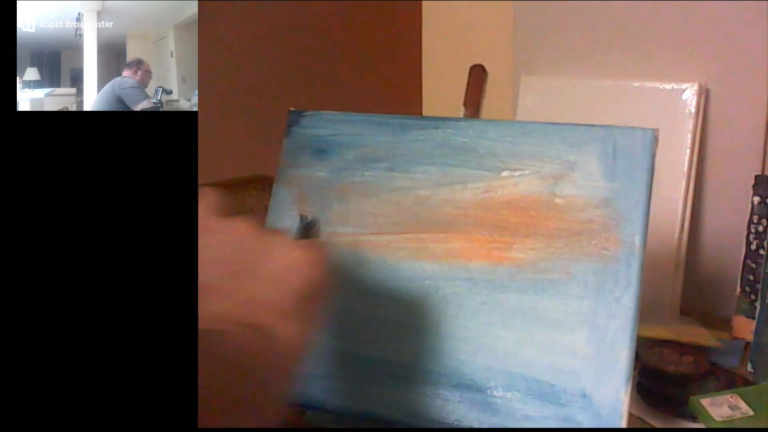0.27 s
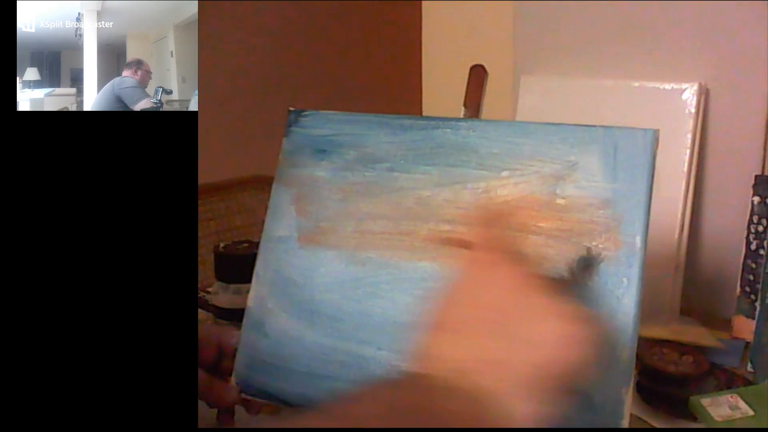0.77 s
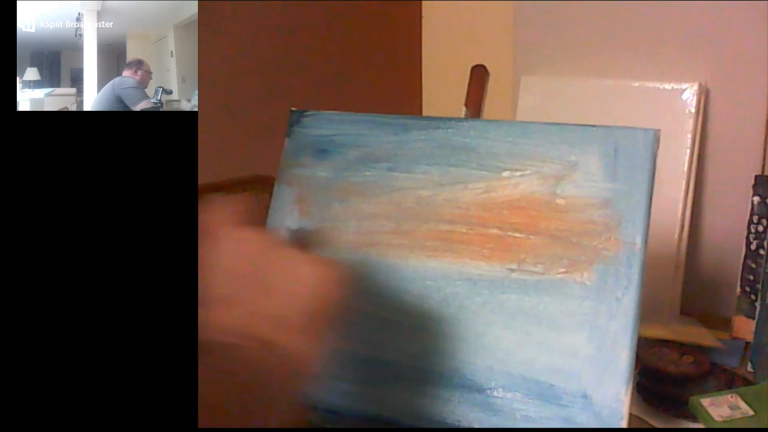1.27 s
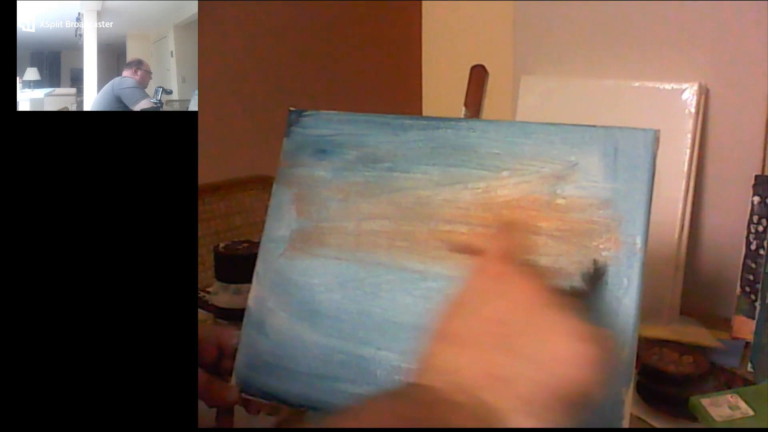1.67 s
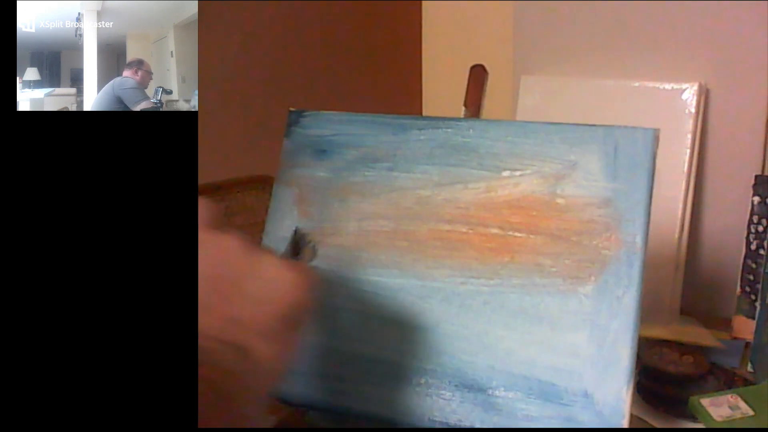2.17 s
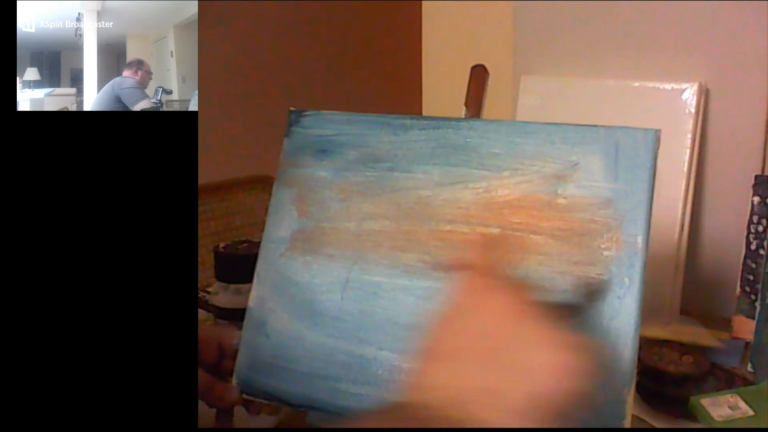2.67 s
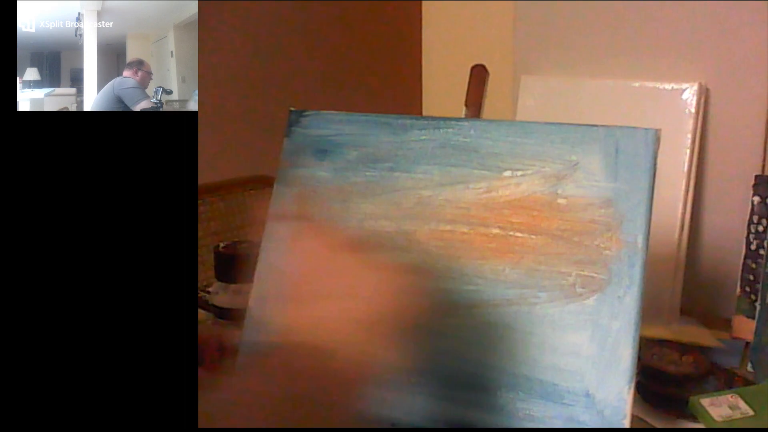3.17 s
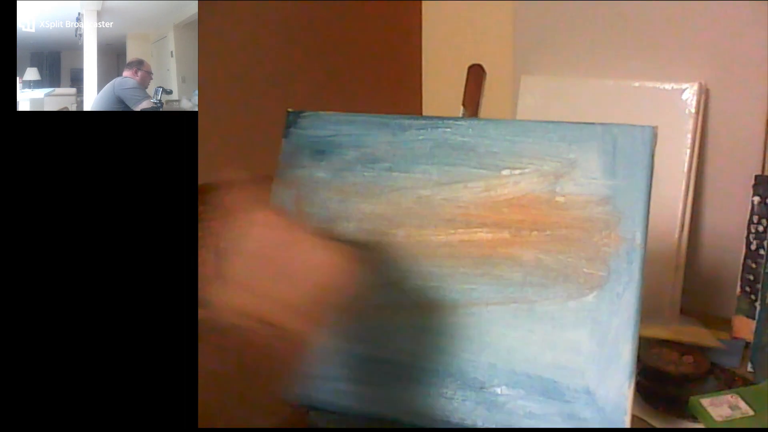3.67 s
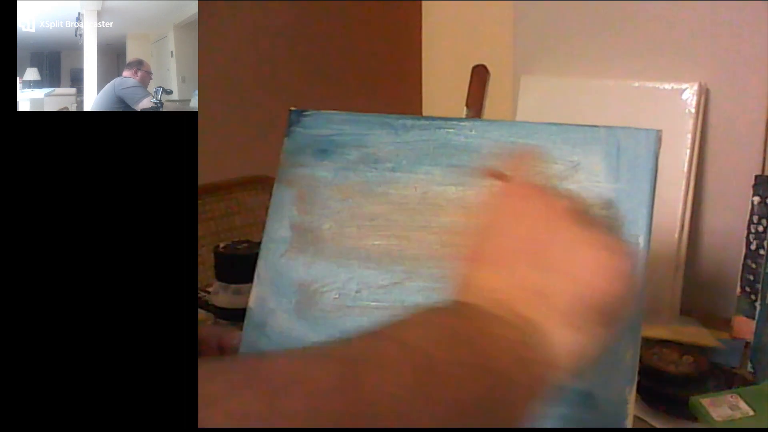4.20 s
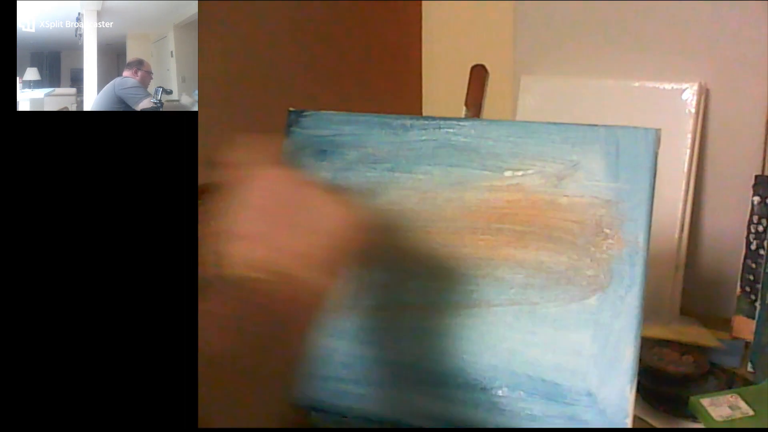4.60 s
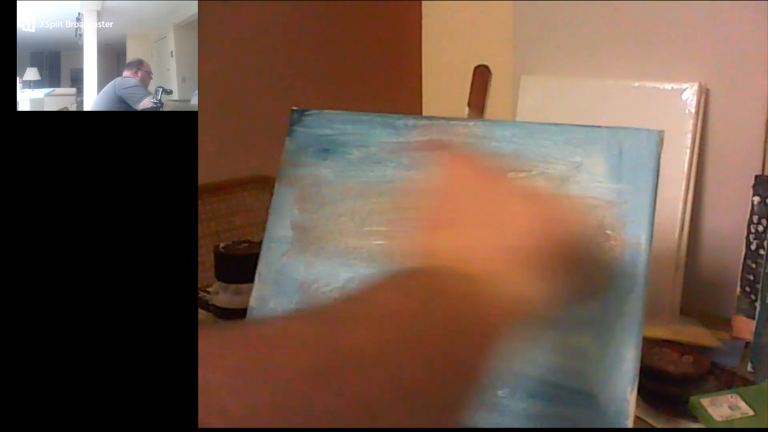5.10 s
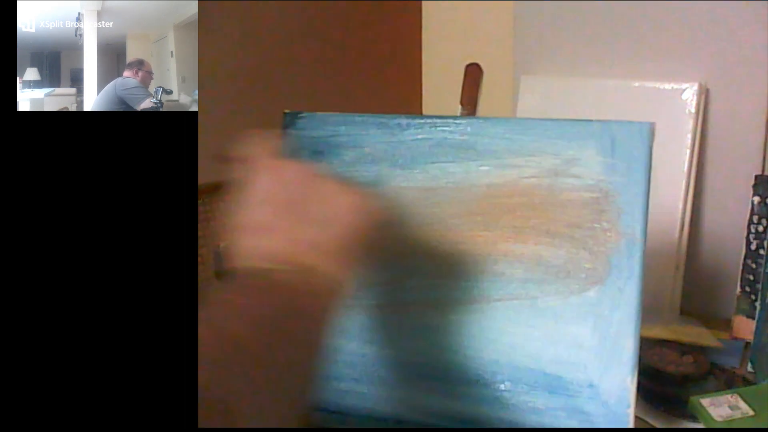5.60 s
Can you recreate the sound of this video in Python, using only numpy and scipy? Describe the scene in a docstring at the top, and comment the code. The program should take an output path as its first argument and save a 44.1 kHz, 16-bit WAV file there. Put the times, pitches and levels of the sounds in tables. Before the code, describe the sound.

A bristle paintbrush scrubs back and forth across a stretched canvas, about two scratchy swishes a second, in a quiet room.

```python
"""A bristle brush scrubs to and fro over a stretched canvas: thirteen strokes in a small quiet room.
Each stroke bites, swells to a crest, eases and lifts; a faint swish lingers while the hand turns.
Bristles catch on the weave and flick free; the cloth answers like a slack drum and thuds when pushed.
A close microphone adds a sharp presence peak near 4.8 kHz."""
import sys
import numpy as np
from scipy import signal
from scipy.fft import rfft, irfft, next_fast_len
from scipy.io import wavfile
from scipy.ndimage import uniform_filter1d, map_coordinates

SR = 44100
rng = np.random.default_rng(int(sys.argv[2]) if len(sys.argv) > 2 else 0)


def master_out(mix):
    """Clip the mix to full scale and print it as 16-bit PCM to the path in sys.argv[1]."""
    frames = np.transpose(np.atleast_2d(mix))
    ceiling = np.clip(frames, -1, 1)
    pcm = np.round(ceiling * 32767).astype(np.int16)
    wavfile.write(sys.argv[1], SR, pcm)


N = 257984
TIME_S = np.arange(N) / SR
CONTROL_S = TIME_S[::16]  # grid for slow levels

# Strokes, out and back in turn: (start [s], bite [dB/s], swell [s], ease [s], crest [dB], swell [dB],
# ease [dB], swish in next turn [dB], then cloth drum, hollow rub, weave rasp, tip fizz [dB re crest])
STROKES = [(0.188, 560, 0.087, 0.15, -28.5, 4.5, 10, -73, -18.5, -13.5, -6.5, -15),
           (0.614, 722, 0.11, 0.16, -22, 10, 13, -59, -17, -11, -9, -15.5),
           (1.109, 750, 0.16, 0.11, -31.5, 4, 6, -54.5, -21.5, -9.5, -5, -14.5),
           (1.572, 700, 0.11, 0.14, -22, 12.5, 12.5, -73, -13.5, -12, -9.5, -16.5),
           (2.085, 648, 0.18, 0.041, -28, 4, 4, -60.5, -20, -13, -7, -16),
           (2.477, 750, 0.098, 0.14, -25, 9.5, 15, -57.5, -17, -13.5, -9, -17),
           (2.907, 900, 0.12, 0.11, -24, 6, 10.5, -54.5, -20, -13, -8.5, -16.5),
           (3.334, 478, 0.11, 0.1, -27.5, 9, 7, -56.5, -21.5, -11, -9.5, -14),
           (3.769, 950, 0.16, 0.082, -22.5, 9, 9, -61.5, -26, -15.5, -8.5, -20.5),
           (4.195, 1700, 0.16, 0.11, -29.5, 4.5, 3.5, -75, -31, -11, -8, -19),
           (4.681, 1900, 0.25, 0.074, -22.5, 11, 9, -36, -25, -14, -9, -21.5),
           (5.122, 1900, 0.13, 0.18, -29, 1, 8.5, -56.5, -30, -13.5, -10.5, -19.5),
           (5.659, 1000, 0.13, 0.13, -25, 8.5, 8, -60, -24, -17, -8, -22)]


def amp(db):
    """Decibels to gain."""
    return 10 ** (np.asarray(db) / 20)


def unit(x):
    """x at rms 1."""
    return x / np.sqrt(np.mean(x ** 2) + 1e-20)


def along(points, hz):
    """(frequency [Hz], value) points read on a log axis."""
    knots_hz, values = np.transpose(points)
    return np.interp(np.log(hz + 1), np.log(knots_hz), values)


def wobble(rate_hz):
    """Smooth random curve with knots at rate_hz."""
    knots = rng.standard_normal(int(N * rate_hz / SR) + 4)
    return map_coordinates(knots, [TIME_S * rate_hz])


def add(track, start_s, sound):
    """Mix sound into track."""
    part = track[max(0, round(start_s * SR)):][:len(sound)]
    part += sound[:len(part)]


def coloured(x, gain):
    """Minimum-phase filter with magnitude gain(hz)."""
    size = 2 * next_fast_len(N // 2 + 8192)
    magnitude = np.maximum(gain(np.fft.rfftfreq(size, 1 / SR)), 1e-6)
    cepstrum = irfft(np.log(magnitude), size)
    cepstrum[1:size // 2] *= 2
    cepstrum[size // 2 + 1:] = 0
    return irfft(rfft(x, size) * np.exp(rfft(cepstrum)), size)[:N]


def spectrum(points):
    """Gain through (frequency [Hz], level [dB]) points."""
    return lambda hz: amp(along(points, hz))


def resonances(modes, low_hz, high_hz):
    """Gain of overlapping modes in a body that radiates between two edges."""
    def gain(hz):
        power = sum(amp(db) ** 2 / (1 + (2 * (hz - centre) / width) ** 2) for centre, width, db in modes)
        return np.sqrt(power / (1 + (low_hz / (hz + 1)) ** 8 + (hz / high_hz) ** 8))
    return gain


def hiss(level_db=-62.5):
    """Steady room and microphone noise."""
    # Noise spectrum: (frequency [Hz], relative density [dB])
    noise_shape = [(25, -40), (80, -10), (160, 6), (450, 3), (1200, -11.5), (1800, -3), (2700, -9),
                   (3500, -1.5), (4750, 10.5), (6200, -5), (8500, -22), (15500, -22)]
    return amp(level_db) * unit(coloured(rng.standard_normal(N), spectrum(noise_shape)))


def room(x):
    """Short wall reverberation; treble dies first."""
    # Room decay: (frequency [Hz], T60 [s])
    decay = [(200, 0.13), (2000, 0.079), (10000, 0.054)]
    hz, t, bins = signal.stft(rng.standard_normal(SR // 3), SR, nperseg=256)
    tail = signal.istft(bins * amp(-60 * t / along(decay, hz)[:, None]), SR, nperseg=256)[1]
    return signal.fftconvolve(x, tail / np.linalg.norm(tail))[:N]


def flicks(gain_db=-12.0, t60_s=0.057):
    """Dry ticks: a tuft lands or snaps over a ridge of paint."""
    # Tuft snaps: (time [s], relative level [dB])
    snaps = [(0.588, -35), (0.71, -20), (2.475, -19), (2.789, -34), (2.849, -12), (2.898, -23),
             (3.757, -28), (3.872, -16), (4.195, -23), (4.576, -39), (4.637, -12.5), (4.655, -26),
             (4.68, -12.5), (5.122, -31)]
    # Tick spectrum: (frequency [Hz], gain [dB])
    tick_shape = [(300, -24), (900, -1), (1400, 2.5), (2000, -4.5), (3200, -9.5), (4800, -5), (6500, -34),
                  (15000, -51)]
    track, t = np.zeros(N), np.arange(SR // 10) / SR
    for start_s, db in snaps:
        add(track, start_s, amp(db + gain_db - 60 * t / t60_s) * rng.standard_normal(len(t)))
    return coloured(track, spectrum(tick_shape))


def thuds(gain_db=-6.0):
    """A soft push swells the low cloth modes; resting bristles damp them as fast."""
    # Cloth pushed in or let go: (crest [s], relative peak [dB], half length [s], pitch [ratio to rest])
    pushes = [(0.081, -26.5, 0.011, 1.09), (0.118, -25, 0.0066, 1.1), (0.176, -40, 0.0092, 1.03),
              (0.575, -40.5, 0.024, 1.02), (0.915, -38, 0.011, 1.03), (1.523, -45.5, 0.013, 0.94),
              (2.595, -30.5, 0.017, 1.02), (2.806, -37.5, 0.022, .92), (2.861, -28, 0.011, 0.94),
              (3.08, -38, 0.012, 0.95), (3.188, -42, 0.011, 0.82), (3.258, -35.5, 0.015, 0.91),
              (4.08, -43.5, 0.0092, 1.1), (4.601, -38.5, 0.01, 0.99), (4.682, -35.5, 0.01, 0.93),
              (4.855, -31, 0.008, 1.1), (4.894, -35, 0.014, 1.02), (4.977, -45, 0.014, 0.92),
              (5.139, -35, 0.0088, 0.86), (5.203, -40, 0.014, 0.94), (5.277, -38, 0.025, 1),
              (5.494, -46, 0.015, 1.03)]
    # Low cloth modes: (frequency [Hz], relative level [dB])
    cloth_modes = [(165, -4), (195, 2), (240, 5.5), (330, -7), (410, -4)]
    track, t = np.zeros(N), np.arange(-SR // 20, SR // 20) / SR
    for crest_s, peak_db, half_s, pitch in pushes:
        ring = sum(amp(db + rng.normal(0, 1)) * np.sin(2 * np.pi * (hz * pitch * t + rng.random()))
                   for hz, db in cloth_modes)
        ring /= np.cosh(t / half_s) ** 2
        add(track, crest_s + t[0], amp(peak_db + gain_db) * ring / np.abs(ring).max())
    return track


def loudest_db(levels_db):
    """Maximum of control-rate levels, per sample."""
    return np.interp(TIME_S, CONTROL_S, np.max(levels_db, axis=0))


def held_db(rows, attack_db_per_s, release_db_per_s):
    """Level of light contacts from (start [s], length [s], level [dB]) rows."""
    return loudest_db([db - attack_db_per_s * np.maximum(start_s - CONTROL_S, 0)
                       - release_db_per_s * np.maximum(CONTROL_S - start_s - length_s, 0)
                       for start_s, length_s, db in rows])


def stroke_db(law, layer):
    """Level of one layer: each stroke bites, arches over its crest and lifts off."""
    arch_share, bite_share, release_db_per_s, near_db, overhang_s = law
    t, levels_db = CONTROL_S, []
    for k, stroke in enumerate(STROKES):
        start_s, bite_db_per_s, swell_s, ease_s, crest_db, swell_db, ease_db = stroke[:7]
        drum_db, rub_db, rasp_db, fizz_db = stroke[8:]
        returning = k % 2
        crest_s = start_s + swell_s
        end_s = crest_s + ease_s
        top_db = crest_db + dict(scrub=0, drum=drum_db, rub=rub_db, rasp=rasp_db, fizz=fizz_db)[layer]
        arch_db = (swell_db * np.clip((crest_s - t) / swell_s, 0, 1) ** 1.32
                   + ease_db * np.clip((t - crest_s) / ease_s, 0, 1) ** 1.49)
        nearness = np.interp(t, [start_s, end_s], [-.5, .5] if returning else [.5, -.5])
        land_s, lift_s = (start_s, end_s + overhang_s) if returning else (start_s - overhang_s, end_s)
        lift_db = (bite_share * bite_db_per_s * np.maximum(land_s - t, 0)
                   + release_db_per_s * np.maximum(t - lift_s, 0))
        levels_db.append(top_db + near_db * nearness - arch_share * arch_db - lift_db)
    return loudest_db(levels_db)


def contact_db():
    """Scrub, drum, rub, rasp and fizz levels from strokes, turns and grazes."""
    # Layer response to a stroke; outward strokes start at the near side: (arch share [ratio],
    # bite share [ratio], release [dB/s], near over far side [dB], near-side overhang [s])
    scrub_law = (1, 1, 480, 1.5, -0.01)
    drum_law = (0.67, 0.69, 370, 4.8, 0.016)
    rub_law = (0.83, 1.2, 425, 1.4, 0.0034)
    rasp_law = (0.95, 1.34, 418, -3, 0.0064)
    fizz_law = (0.88, 1.2, 750, -5, -.006)
    # Tuft grazes the cloth as it is set down: (start [s], length [s], rub [dB], scrub [dB])
    grazes = [(0.065, 0.05, -62.5, -59.5), (0.13, 0.04, -63, -54), (1.06, 0.02, -56, -52),
              (1.08, 0.02, -47.5, -53), (1.993, 0.027, -58, -48), (2.045, 0.042, -42, -47),
              (2.792, 0.049, -46.5, -55.5), (2.845, 0.029, -37.5, -47.5), (3.276, 0.04, -57, -54),
              (4.642, 0.03, -52, -72), (5.048, 0.035, -53.5, -37), (5.605, 0.05, -57, -57)]
    # Brief dips in all layers but the scrub: (time [s])
    dips_s = [0.202, 0.418, 1.162, 1.207, 1.376, 1.737, 1.803, 2.187, 2.548, 3.394, 3.488, 5.795]

    next_starts_s = [row[0] for row in STROKES[1:]] + [N / SR]
    turns = [(start_s + swell_s, next_s - start_s - swell_s, swish_db)
             for (start_s, _, swell_s, _, _, _, _, swish_db, *_), next_s in zip(STROKES, next_starts_s)]
    turn_db = held_db(turns, attack_db_per_s=500, release_db_per_s=500)
    graze_slopes = dict(attack_db_per_s=2200, release_db_per_s=700)
    graze_rub_db = held_db([(s, length_s, db) for s, length_s, db, _ in grazes], **graze_slopes)
    graze_scrub_db = held_db([(s, length_s, db) for s, length_s, _, db in grazes], **graze_slopes)
    dip = sum(np.exp(-((TIME_S - s) / 0.0078) ** 2) for s in dips_s)

    def layer_db(law, layer, floor_db, graze_db, dip_db):
        return np.maximum(stroke_db(law, layer), np.maximum(floor_db, graze_db)) - dip_db * dip

    # drum, rub and rasp rest on constant floors, the brush barely moving; scrub and fizz follow the swish of
    # each turn
    return (layer_db(scrub_law, "scrub", floor_db=turn_db, graze_db=graze_scrub_db, dip_db=0),
            layer_db(drum_law, "drum", floor_db=-77, graze_db=graze_rub_db - 5, dip_db=4.5),
            layer_db(rub_law, "rub", floor_db=-72.5, graze_db=graze_rub_db, dip_db=4.5),
            layer_db(rasp_law, "rasp", floor_db=-69.5, graze_db=graze_rub_db - 9, dip_db=4.5),
            layer_db(fizz_law, "fizz", floor_db=turn_db - 18.5, graze_db=graze_scrub_db - 15.5,
                     dip_db=34))


def sliding(out_hz, back_hz, width_hz, floor):
    """Gain of a resonance moving between (first, last) centres in each outward and return stroke."""
    path = [point for k, (start_s, _, swell_s, ease_s, *_) in enumerate(STROKES)
            for point in zip((start_s, start_s + swell_s + ease_s), back_hz if k % 2 else out_hz)]
    path_s, centre_hz = np.transpose(path)
    return lambda hz, s: floor + 1 / (1 + (2 * (hz - np.interp(s, path_s, centre_hz)) / width_hz) ** 2)


def shifting(x, patchy_db, gain=lambda hz, s: 1):
    """Modes swell and fade as the brush crosses their nodes; output rms 1."""
    hz, s, bins = signal.stft(x, SR, nperseg=1024, noverlap=768)
    patches = uniform_filter1d(rng.standard_normal(bins.shape), size=5, axis=0)
    patches = uniform_filter1d(patches, size=9, axis=1)
    shaped = bins * amp(patchy_db * unit(patches)) * gain(hz[:, None], s)
    # energy only passes between modes
    shaped *= np.linalg.norm(bins, axis=0) / (np.linalg.norm(shaped, axis=0) + 1e-20)
    return unit(signal.istft(shaped, nperseg=1024, noverlap=768)[1][:N])


def slips(clumps, rate_hz, spread_db):
    """Bristles slip off threads: random impulses sized by the clumps."""
    happens = rng.random(N) < rate_hz / SR
    sizes = amp(spread_db * (2 * rng.random(N) - 1))
    return happens * rng.choice([-1, 1], N) * clumps * sizes


def brush():
    """Bristles drag over the weave; their slips sound in cloth, frame and tuft."""
    # Modes of the cloth, the cloth on its frame, and weave and handle:
    # (frequency [Hz], width [Hz], relative level [dB])
    drum_modes = [(180, 32, -18.5), (238.4, 26, -4), (373, 23.6, -1), (416, 31, 0.5), (520, 50, -14),
                  (572, 65, -2), (670, 180, -9)]
    frame_modes = [(795, 41, -2), (909, 69, 0.5), (1030, 53, -2.5), (1194, 34, -3), (1479, 164, 0.5),
                   (1576, 106, -3.5)]
    weave_modes = [(1887, 82, -1.5), (2550, 710, -5), (2694, 460, 0), (3316, 380, -2), (4160, 290, -2)]
    # Tuft and bristle-tip spectra, microphone peak included: (frequency [Hz], relative density [dB])
    scrub_shape = [(900, -65), (2000, -44), (3000, -15.5), (3700, -6.5), (4250, -2.5), (4600, 2), (4950, 3),
                   (5400, -2.5), (6000, -9), (7000, -15), (8500, -30), (12000, -44.5)]
    fizz_shape = [(3500, -30), (5500, -0.5), (7000, 3), (8500, -2), (10000, -7), (12500, -16), (15500, -21)]

    scrub_db, drum_db, rub_db, rasp_db, fizz_db = contact_db()
    # neighbouring bristles let go together, only so many at once
    clumps = amp(2.32 * np.tanh(0.41 * wobble(600) + .5 * wobble(130)))
    drag_db = 1.07 * wobble(35)  # varies with the paint under the tuft
    drum = coloured(slips(clumps, rate_hz=3000, spread_db=5), resonances(drum_modes, 207, 780))
    rub = coloured(slips(clumps, rate_hz=4000, spread_db=5), resonances(frame_modes, 636, 1690))
    rasp = coloured(slips(clumps, rate_hz=5000, spread_db=2), resonances(weave_modes, 1730, 4330))
    scrub = coloured(slips(clumps, rate_hz=7000, spread_db=3), spectrum(scrub_shape))
    fizz = coloured(slips(clumps, rate_hz=5500, spread_db=-0.5), spectrum(fizz_shape))
    # the hollow follows the brush across the cloth
    hollow = sliding(out_hz=(1050, 1338), back_hz=(1338, 1050), width_hz=200, floor=0.55)
    # the tuft bends the other way on return, shifting its pitch
    swish = sliding(out_hz=(4440, 4440), back_hz=(5040, 5040), width_hz=1450, floor=1.35)
    tips_db = 0.55 * wobble(25)  # the finest tips come and go
    return amp(drag_db) * (amp(drum_db) * shifting(drum, patchy_db=7.5)
                           + amp(rub_db) * shifting(rub, patchy_db=5.0, gain=hollow)
                           + amp(rasp_db) * shifting(rasp, patchy_db=4.5)
                           + amp(scrub_db) * shifting(scrub, patchy_db=3.0, gain=swish)
                           + amp(fizz_db + tips_db) * shifting(fizz, patchy_db=-0.5))


def scene():
    """Brush on canvas, room and noise floor; mono."""
    canvas = brush() + thuds() + flicks()
    return (canvas + amp(-11.5) * room(canvas) + hiss())[None]


def record(dry):
    """Short fade-out and brick-wall low-pass."""
    fade_s, top_hz = 0.006, 15800
    size = next_fast_len(N + SR // 2)
    fade = np.minimum(TIME_S[::-1] / fade_s, 1)
    passband = np.fft.rfftfreq(size, 1 / SR) < top_hz
    return irfft(rfft(dry * fade, size) * passband, size)[..., :N]


dry = scene()
out = record(dry)
master_out(out)
```